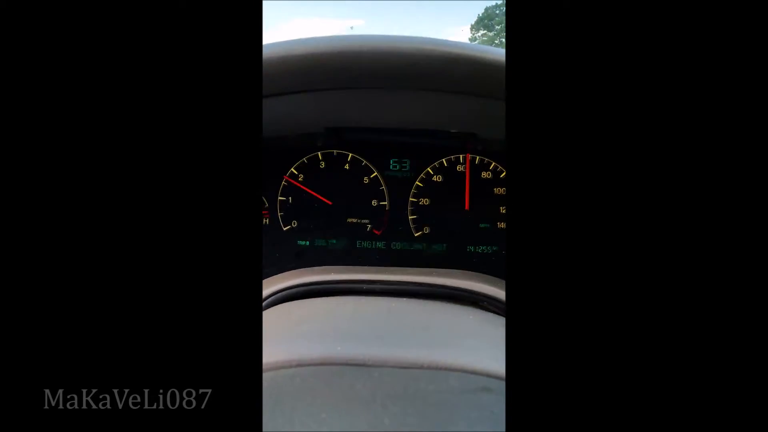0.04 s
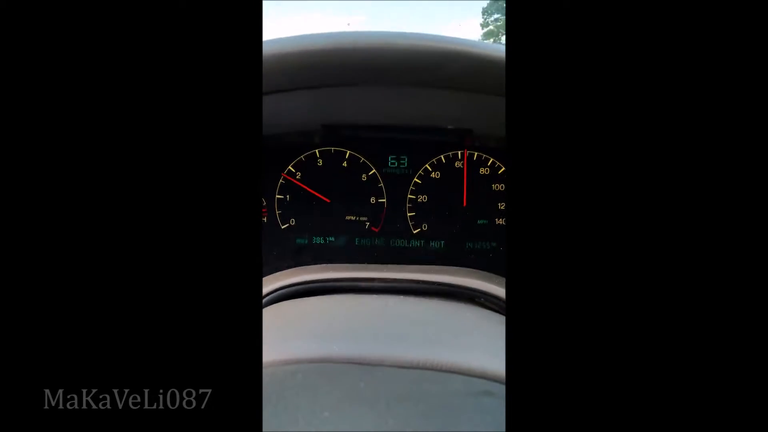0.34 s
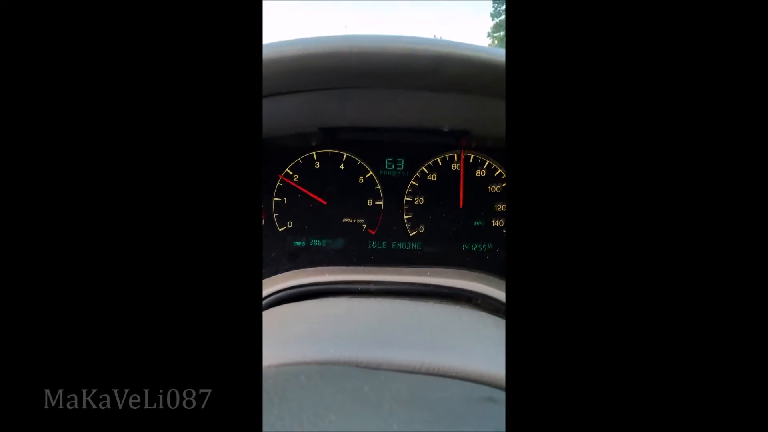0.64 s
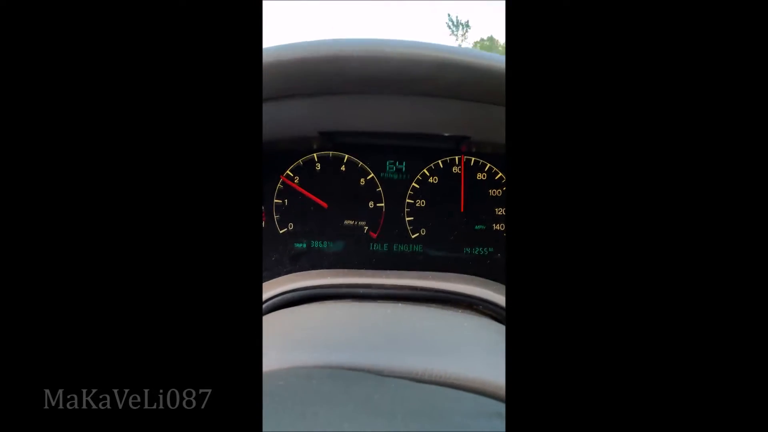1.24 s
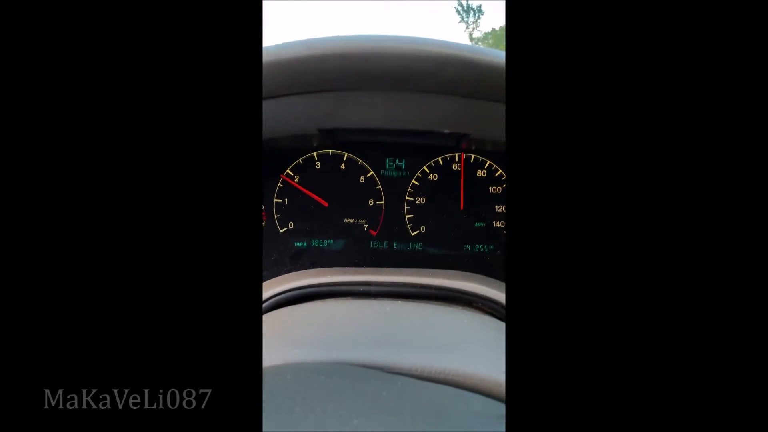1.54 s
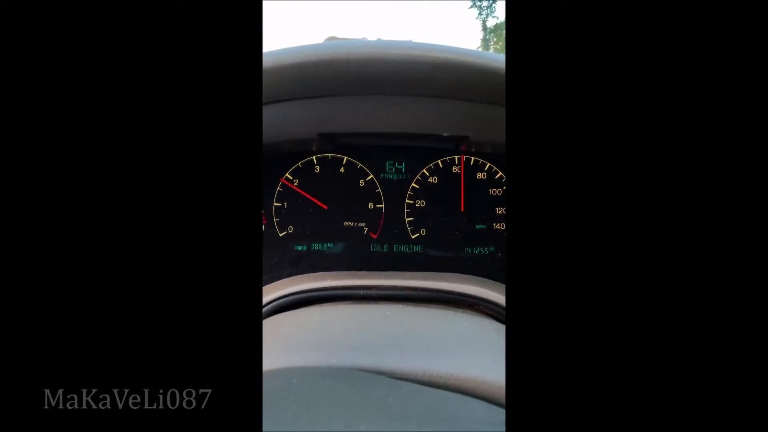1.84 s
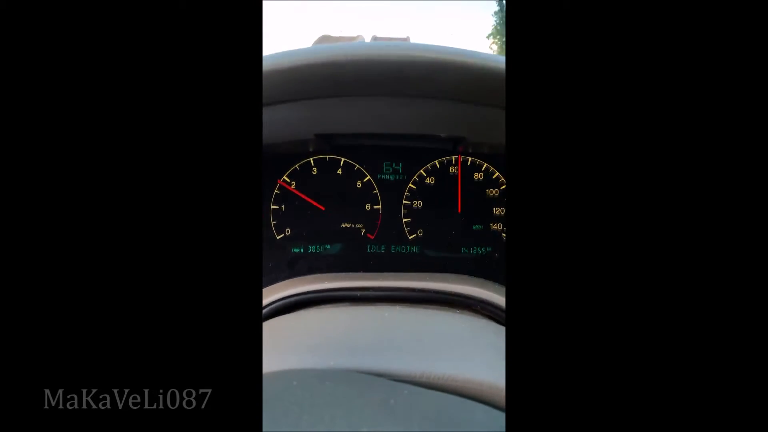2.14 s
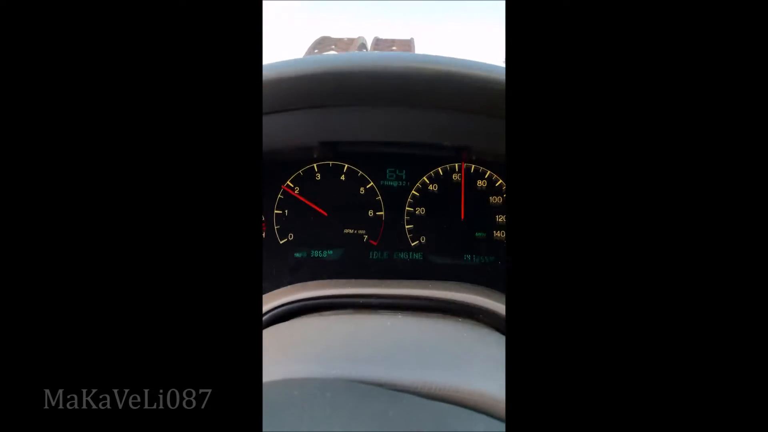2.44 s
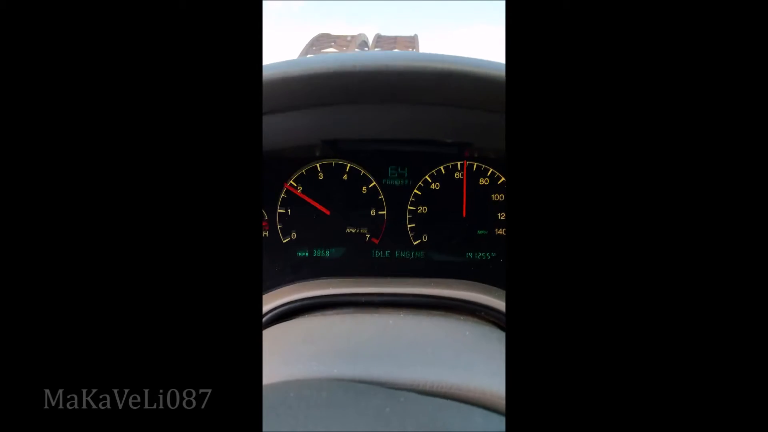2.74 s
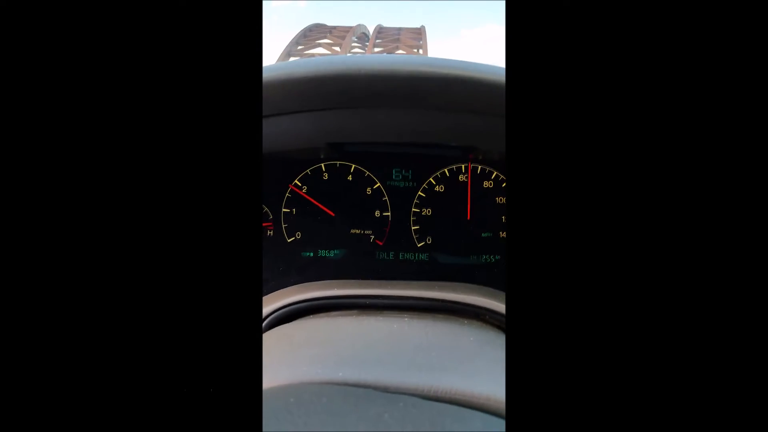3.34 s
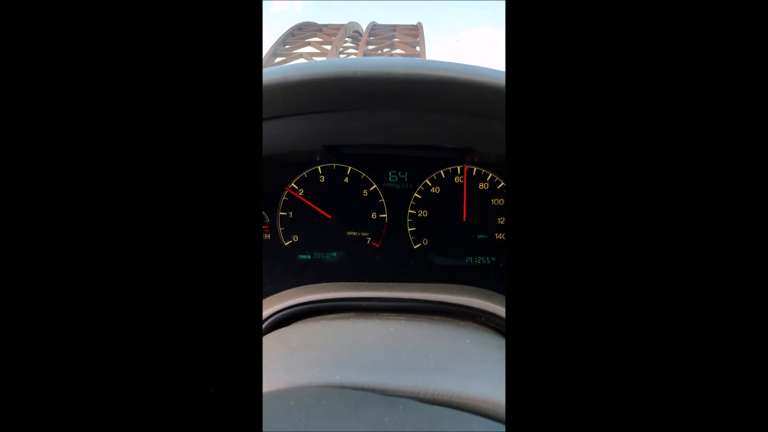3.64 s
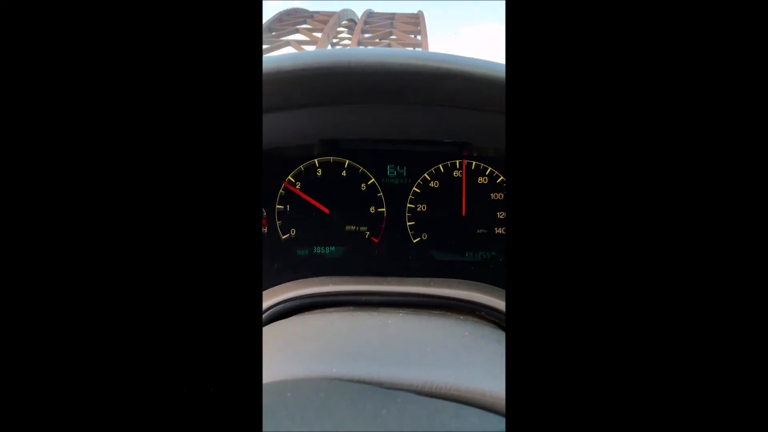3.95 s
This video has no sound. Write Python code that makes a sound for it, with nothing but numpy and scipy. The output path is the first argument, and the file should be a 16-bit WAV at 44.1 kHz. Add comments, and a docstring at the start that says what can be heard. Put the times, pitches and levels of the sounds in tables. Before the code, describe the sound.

Low road rumble runs throughout inside a car at highway speed, with tyre roar and an even engine hum. Close to the microphone at the driver's seat, soft wind flutters at the window with a few faint spits.

```python
"""A deep road rumble fills a car cruising at about 100 km/h; stereo pair at the driver's seat.
The rumble comes through the body, uneven tyres drone, and their roar shifts with the highway surface.
Ahead, behind the bulkhead, the engine hum settles in pitch and firms up as it takes load.
Close by, wind hisses and flutters along the side window, with a few faint, short spits."""
import sys
import numpy as np
from scipy import signal
from scipy.fft import rfft, irfft
from scipy.io import wavfile
from scipy.ndimage import uniform_filter1d, minimum_filter1d

SR = 44100
rng = np.random.default_rng(int(sys.argv[2]) if len(sys.argv) > 2 else 0)


def output_pcm(signal):
    """Save a mono or channel-first signal as 16-bit PCM at the path in sys.argv[1].

    Samples are clipped to [-1, 1] before scaling.
    """
    pcm = np.clip(np.atleast_2d(signal).T, -1, 1) * 32767
    wavfile.write(sys.argv[1], SR, np.round(pcm).astype(np.int16))


N = 176400
T = np.arange(N) / SR
FREQS = np.maximum(np.fft.rfftfreq(N, 1 / SR), 1e-3)

# colour of the road rumble through the body (frequency [Hz], relative level [dB])
RUMBLE_SPECTRUM = [(6, -28), (14, -15), (26, 0), (43, 2), (60, -2), (85, -4), (115, -5), (175, -5),
                   (205, -9.5), (240, -15), (310, -16.5), (420, -20), (520, -26.5), (800, -39), (2000, -76)]
# colour of the tyre roar from inside (frequency [Hz], relative level [dB])
ROAR_SPECTRUM = [(200, -56), (450, -5.5), (570, -5.5), (660, -1), (790, -1.5), (920, 0.5), (1030, 0.5),
                 (1170, 0.2), (1290, -2.5), (1420, -2), (1700, -2), (1880, -10), (2020, -7), (2260, -8.5),
                 (2450, -15), (3300, -23.5), (4500, -36), (9000, -60)]
# tyre roar as the road surface changes (time [s], gain [dB])
ROAR_SWELL = [(0, 1), (.35, -.5), (.55, 0.5), (.95, 0.9), (1.15, 0), (1.32, 0), (1.9, -0.5), (2.1, -1),
              (2.6, 0.5), (3.15, 0.5), (3.5, 1.5), (3.85, 0.1), (4.0, 2.5)]
# hollow ring of the tyres over that surface (time [s], gain [dB])
RING_SWELL = [(0, -5), (.28, 4), (.4, -7), (.47, 3.5), (.6, -14), (.78, -4), (.82, 5), (.88, 8), (.95, 11),
              (1.04, 2), (1.58, -4.5), (1.75, 1), (1.97, -3), (2.2, 1), (2.48, -1), (3.15, -4.5), (3.36, 1),
              (3.72, 3), (4.0, -1)]
# resonances of the higher whoosh (centre [Hz], width [Hz], level [dB])
WHOOSH_RESONANCES = [(1428, 79, -41), (1556, 210, -35)]
# whoosh over the road surface (time [s], gain [dB])
WHOOSH_SWELL = [(0, 1.5), (.45, 0.5), (.59, 4.5), (.88, 3), (1.25, 3.5), (1.34, 5.5), (1.59, 0),
                (1.92, -0.5), (2.08, 7.5), (2.27, -2), (2.44, 6), (2.54, -3), (2.62, 6), (2.78, -4),
                (2.88, 1), (3.18, -5), (3.32, 0), (3.44, -5), (4.0, -9)]
# road noise at the two microphones
# (frequency [Hz], left over right [dB], coherence [0-1], left lead [rad])
ROAD_STEREO = [(40, -2.5, 0.98, 0.32), (198, 3, 0.98, -0.1), (302, -2.5, 0.87, 0.7), (430, 8, 0.83, 0.82),
               (556, 0, 0.53, 0.1), (624, 1, 0.93, -1.3), (743, -2, 0.8, 0), (872, 0, 0.32, -0.3),
               (1003, 3.5, 0.3, 2.5), (1126, 0.5, 0.85, 1.26), (1350, 5, 0.32, -0.5),
               (1540, -3.5, 0.27, 0.2), (1740, 2.5, 0.52, 0.5), (1870, 4.5, 0, 2), (2230, 6.5, 0.4, 2),
               (2700, 10, 0.2, 1.5), (3240, 6, 0.1, 3)]
# drone of the rolling wheels (multiple of the wheel rate [-], level [dB], waver [dB])
WHEEL_HARMONICS = [(5, -22, 2.5), (10, -21, 1.7), (15, -31.5, 0.5)]
# swell of that drone (time [s], gain [dB])
DRONE_SWELL = [(0, -4.5), (.3, 1.5), (.9, -5), (1.2, -5.5), (1.55, 1.5), (2.5, 1), (2.95, 2), (4.0, 0.5)]
# firing rate of the engine (time [s], rate [Hz])
FIRING_RATE = [(0, 100), (.15, 99.5), (.35, 97.87), (.8, 97), (1.1, 97.21), (4.0, 97.41)]
# engine hum as it takes load (time [s], gain [dB])
ENGINE_LOAD = [(0, -7), (.6, -3), (1.0, -1), (1.6, 0), (2.4, -1), (4.0, -0.5)]
# engine hum at the driver's seat
# (multiple of the firing rate [-], level [dB], left over right [dB], left lead [rad], waver [dB])
ENGINE_HARMONICS = [(1, -29, 0, 0.079, 6), (2, -24.5, 0, 0.31, 1.5), (3, -33, 9, 0.58, 3),
                    (4, -25.5, 7, 1.78, -0.86), (5, -41, 8.5, 0.36, 3)]
# boom that the cabin makes of the engine's second harmonic (time [s], gain [dB])
BOOM_SWELL = [(0, 4), (.9, -0.5), (1.3, -1.5), (1.75, -1), (2.05, 1.5), (2.25, 4), (2.62, 4.5), (3.1, -4),
              (4.0, 1)]
# colour of the steady hiss at the side window (frequency [Hz], relative level [dB])
HISS_SPECTRUM = [(1000, -17), (2500, 2.5), (4000, 2), (5500, 0.5), (7200, -1.5), (7800, -3), (8500, -14),
                 (10000, -8.5), (12500, -22), (14000, -29), (16000, -20)]
# hiss at the microphones (frequency [Hz], left over right [dB], coherence [0-1], left lead [rad])
HISS_STEREO = [(2500, 4.5, 0.15, 2), (7360, 9, 0.42, 3), (8700, 3, .3, 1.5), (10000, -3, .1, 1),
               (12300, -5, .1, -0.5), (14000, 0, .5, -3)]
# colour of the fluttering wind sizzle (frequency [Hz], relative level [dB])
SIZZLE_SPECTRUM = [(1500, -6), (2800, 7.5), (4500, -0.5), (7400, 3), (8600, -5), (9700, -1.5), (12100, 2),
                   (13000, -3), (14200, -10.5), (15600, -7)]
# sizzle at the microphones (frequency [Hz], left over right [dB], coherence [0-1], left lead [rad])
SIZZLE_STEREO = [(7400, 8.5, 0.09, 0), (8600, -1, .4, 0), (10000, -5.5, 0, 0), (12300, -5, 0.2, 0),
                 (13600, -1, 0.7, 0), (15500, -1, .4, 0)]
# strength of the gusts along the glass (time [s], gain [dB])
GUSTS = [(0, 2.5), (.18, 0), (.42, 1), (.55, -0.5), (.65, -1), (.8, 2), (.95, -0.5), (1.07, 2),
         (1.18, -1.5), (1.55, 1.5), (1.78, -1), (1.88, 2.5), (2.06, -1), (2.2, 2), (2.4, -3.5), (2.68, -1),
         (3.02, 4), (3.25, -2), (3.5, -0.5), (3.85, -0.5), (4.0, 4)]
# short spits of wind (time [s], peak over the sizzle's base level [dB], decay [s])
WIND_SPITS = [(.066, 4, 0.022), (0.299, 7.5, 0.021), (1.626, 9, .014), (2.152, 6, 0.028), (2.25, 6, .035),
              (2.503, 3, 0.035), (3.045, -2, .015), (3.535, 2, 0.016)]


def road_rumble():
    """The road shakes the body: a deep, slowly swelling rumble all round the seat."""
    level_db = -14 + 0.85 * wander(per_s=1.9)
    return stereo_noise(RUMBLE_SPECTRUM, ROAD_STEREO) * undb(level_db)


def wheel_drone():
    """Uneven tyres shake the cabin at multiples of the wheel rate."""
    wheel_hz = 13.92 * (1 + 0.0029 * wander(per_s=3.05))
    phase = shaft_phase(wheel_hz)
    drone = sum(partial(multiple * phase, db, waver_db, pan_db=0.5, lead_rad=0.33)
                for multiple, db, waver_db in WHEEL_HARMONICS)
    return drone * undb(curve(DRONE_SWELL))


def engine_hum():
    """Firing harmonics hum through the bulkhead, louder under load; the second booms in the cabin."""
    phase = shaft_phase(curve(FIRING_RATE))
    hum = 0
    for multiple, db, pan_db, lead_rad, waver_db in ENGINE_HARMONICS:
        boom_db = curve(BOOM_SWELL) if multiple == 2 else 0
        hum += partial(multiple * phase, db + boom_db, waver_db, pan_db, lead_rad)
    return hum * undb(curve(ENGINE_LOAD))


def tyre_noise():
    """Under the floor the tyres roar, ring hollowly and whoosh, following the road surface."""
    roar_db = -25.5 + curve(ROAR_SWELL) + 0.98 * wander(per_s=28)
    roar = cabin_echoes(stereo_noise(ROAR_SPECTRUM, ROAD_STEREO)) * undb(roar_db)
    ring = resonance(hz=661, width_hz=88) * undb(-36.5 + curve(RING_SWELL))
    whoosh = sum(resonance(hz, width_hz) * undb(db) for hz, width_hz, db in WHOOSH_RESONANCES)
    return roar + ring + whoosh * undb(curve(WHOOSH_SWELL))


def window_wind():
    """Air along the side window: a smooth hiss, and a grainy sizzle that gusts, flutters and spits."""
    hiss = stereo_noise(HISS_SPECTRUM, HISS_STEREO) * undb(-39.5 + 1.5 * wander(per_s=11))
    flow = undb(curve(GUSTS) + 1.5 * wander(per_s=69))  # gusts with a fast flutter on top
    spit_power = sum((undb(db) * spit(at, decay_s)) ** 2 for at, db, decay_s in WIND_SPITS)
    grain = undb(-40.5 + wander(per_s=610))
    sizzle = stereo_noise(SIZZLE_SPECTRUM, SIZZLE_STEREO) * grain
    return hiss + sizzle * np.sqrt(flow ** 2 + spit_power)


def spit(at, decay_s, attack_s=0.01):
    """Envelope of one spit of wind: a quick rise, then it dies away into the hiss."""
    return np.exp(-np.maximum((at - T) / attack_s, (T - at) / decay_s))


def cabin_echoes(direct, t60_s=0.087, echo_db=-12.5):
    """Short echoes off nearby glass and trim put a fine ripple on the colour; rms 1."""
    response = rng.standard_normal(N) * undb(-60 * T / t60_s)
    response /= np.linalg.norm(response)
    heard = direct + undb(echo_db) * irfft(rfft(direct) * rfft(response), N)
    return heard / heard.std()


def resonance(hz, width_hz):
    """Stereo road noise of rms 1 ringing in one broad resonance."""
    bell = 1 / (1 + (2 * (FREQS - hz) / width_hz) ** 2)
    white = stereo_noise([(hz, 0)], ROAD_STEREO)
    ringing = irfft(rfft(white) * bell, N)
    return ringing / ringing.std()


def stereo_noise(spectrum, stereo):
    """Noise of rms 1 with a given colour, and balance, coherence and lead between the microphones."""
    balance_db, coherence, lead_rad = over_frequency(stereo)
    colour_db, = over_frequency(spectrum)
    left, unrelated = np.exp(2j * np.pi * rng.random((2, len(FREQS))))
    right = (coherence * left + np.sqrt(1 - coherence ** 2) * unrelated) * np.exp(-1j * lead_rad)
    gains = undb(colour_db + np.array([balance_db, -balance_db]) / 2)
    noise = irfft(np.array([left, right]) * gains, N)
    return noise / noise.std()


def partial(phase, db, waver_db, pan_db, lead_rad):
    """One partial at both microphones, wavering about an rms level of `db`."""
    left = undb(pan_db / 2) * np.sin(phase + lead_rad)
    right = undb(-pan_db / 2) * np.sin(phase)
    return np.sqrt(2) * undb(db + waver_db * wander(per_s=10.3)) * np.array([left, right])


def shaft_phase(hz):
    """Phase of a shaft that starts at a random angle."""
    return 2 * np.pi * (np.cumsum(hz) / SR + rng.random())


def wander(per_s):
    """Smooth random drift with about `per_s` new values a second; spread 1."""
    drift = irfft(rfft(rng.standard_normal(N)) * np.exp(-(2 * FREQS / per_s) ** 2), N)
    return (drift - drift.mean()) / drift.std()


def curve(rows):
    """A time table at every sample."""
    return np.interp(T, *np.array(rows).T)


def over_frequency(rows):
    """Each column of a frequency table at every frequency."""
    hz, *columns = np.array(rows, float).T
    return [np.interp(np.log(FREQS), np.log(hz), column) for column in columns]


def undb(db):
    """Decibels to gain."""
    return 10 ** (np.asarray(db) / 20)


def scene():
    """Everything that reaches the microphones at the driver's seat."""
    return road_rumble() + wheel_drone() + engine_hum() + tyre_noise() + window_wind()


def record(dry):
    """A limiter holds down the rare highest peaks; the recorder cuts the top."""
    ceiling, window, top_hz = 0.9, int(0.02 * SR), 15750
    gain = ceiling / np.maximum(np.abs(dry).max(axis=0), ceiling)
    limited = dry * uniform_filter1d(minimum_filter1d(gain, window), window)
    lowpass = signal.ellip(10, 0.1, 80, top_hz, fs=SR, output="sos")
    return signal.sosfilt(lowpass, limited)


dry = scene()
out = record(dry)
output_pcm(out)
```